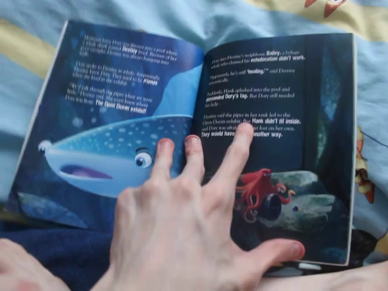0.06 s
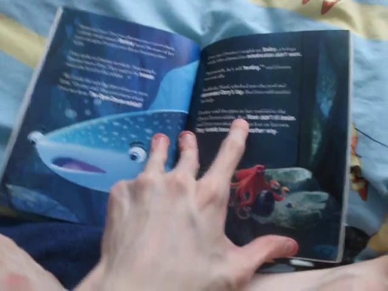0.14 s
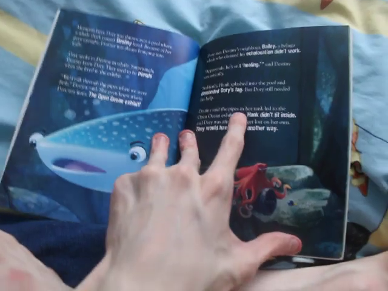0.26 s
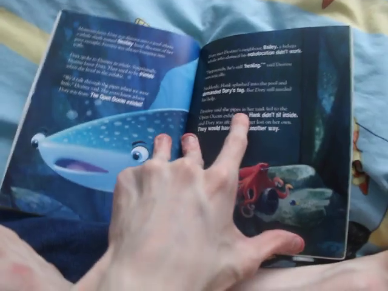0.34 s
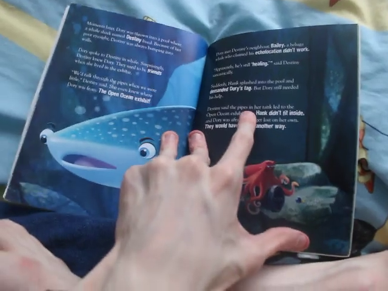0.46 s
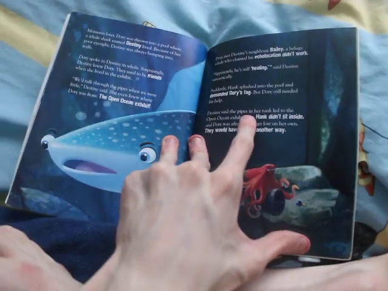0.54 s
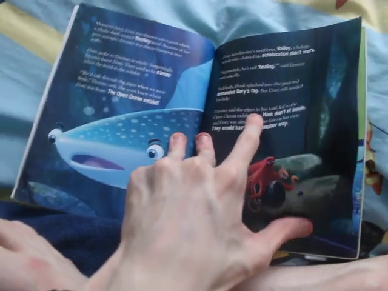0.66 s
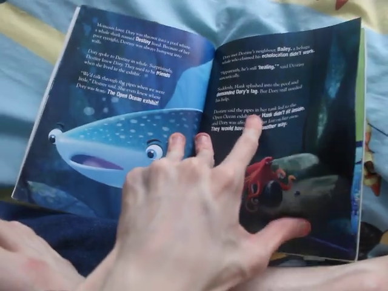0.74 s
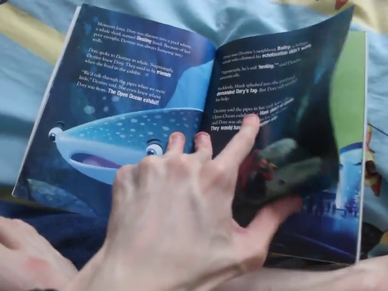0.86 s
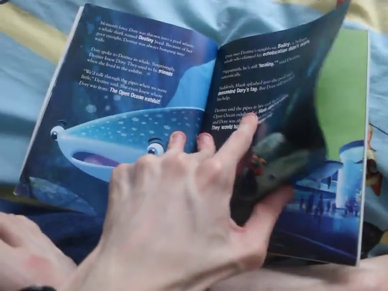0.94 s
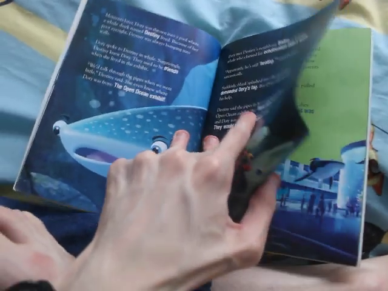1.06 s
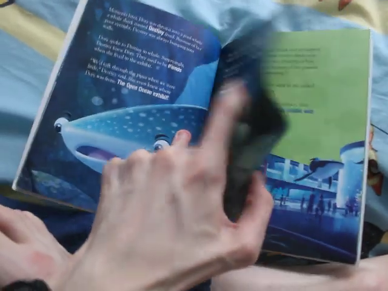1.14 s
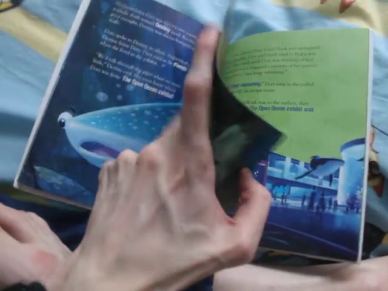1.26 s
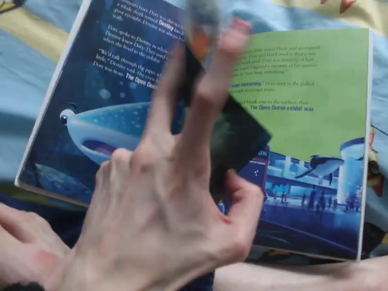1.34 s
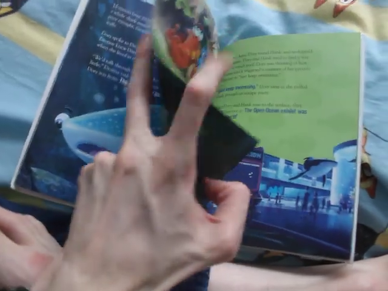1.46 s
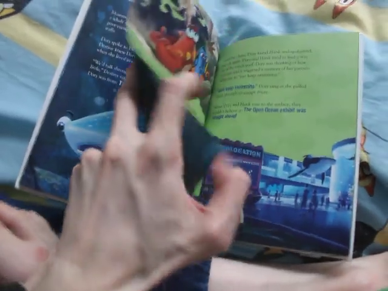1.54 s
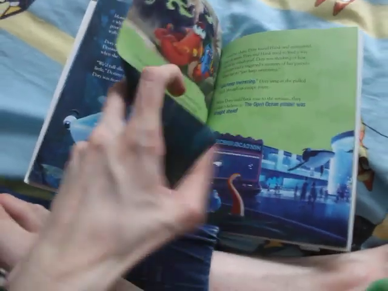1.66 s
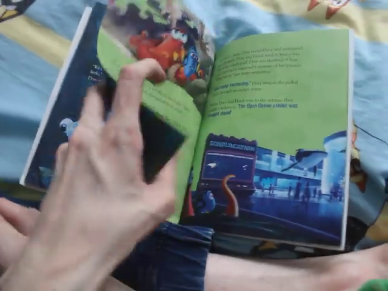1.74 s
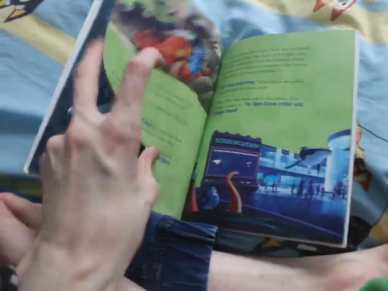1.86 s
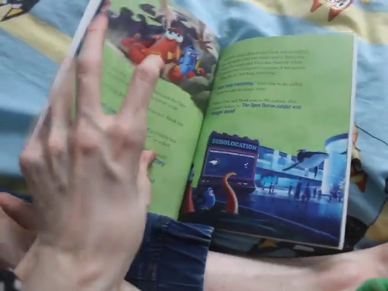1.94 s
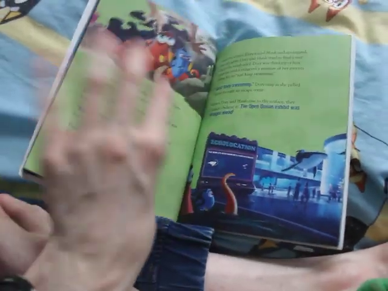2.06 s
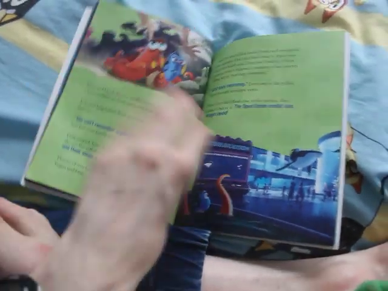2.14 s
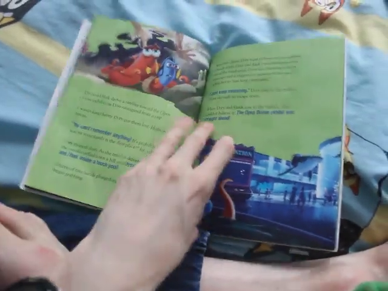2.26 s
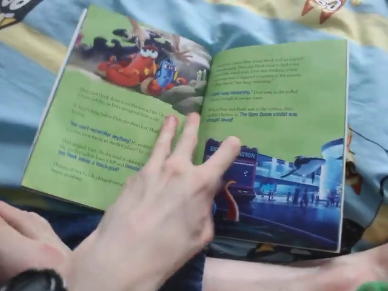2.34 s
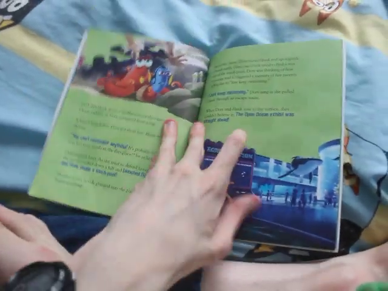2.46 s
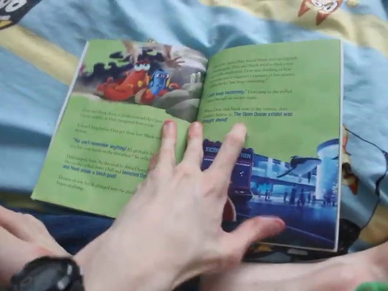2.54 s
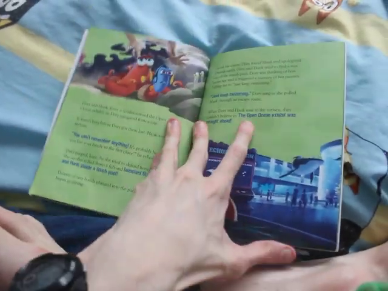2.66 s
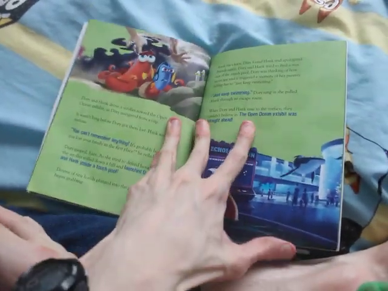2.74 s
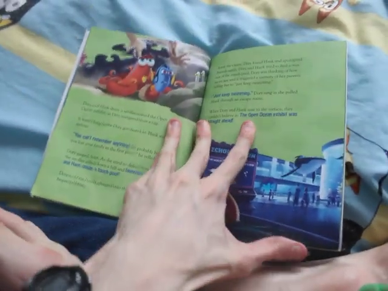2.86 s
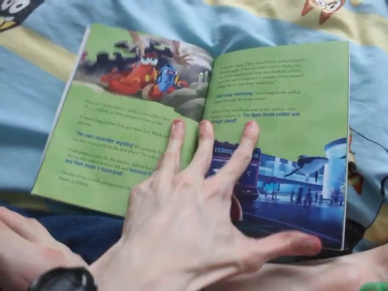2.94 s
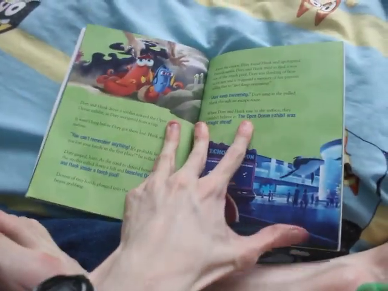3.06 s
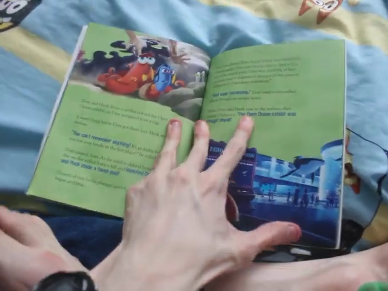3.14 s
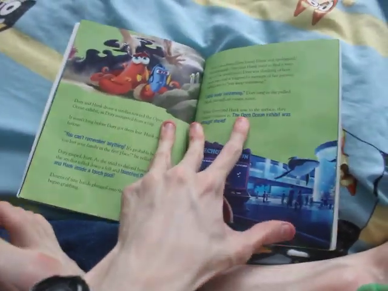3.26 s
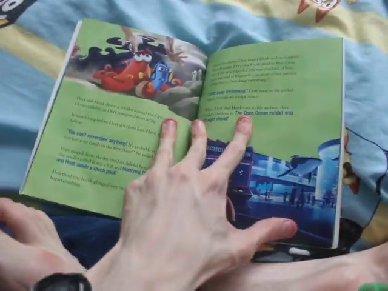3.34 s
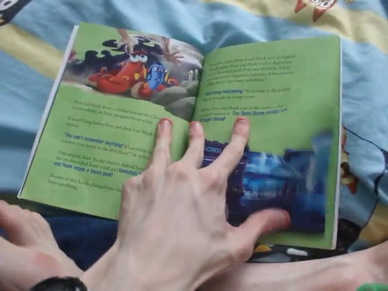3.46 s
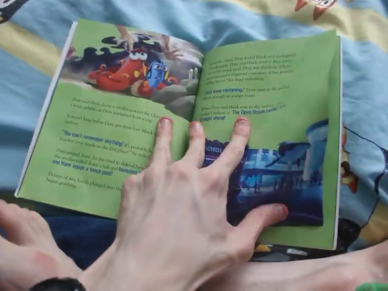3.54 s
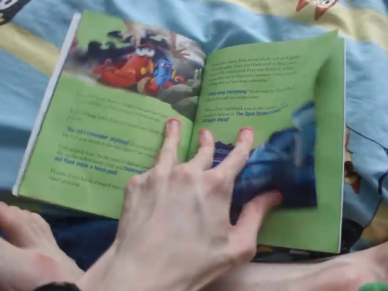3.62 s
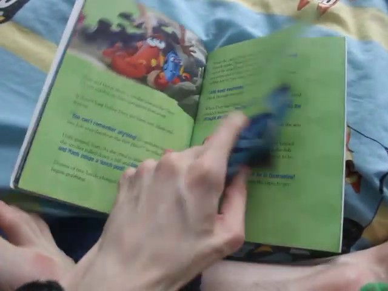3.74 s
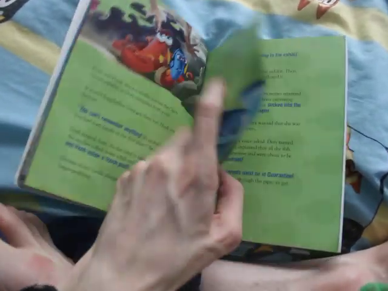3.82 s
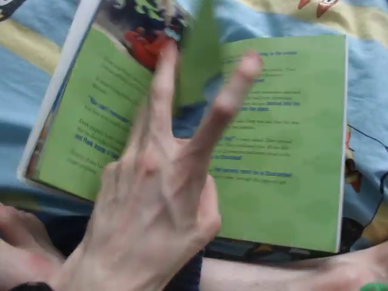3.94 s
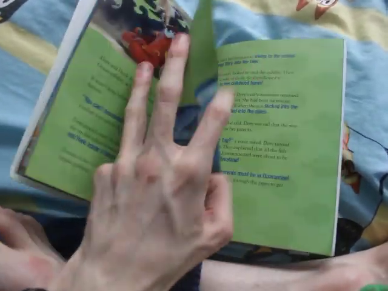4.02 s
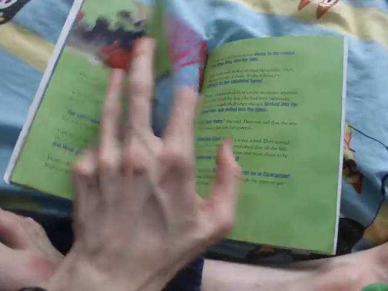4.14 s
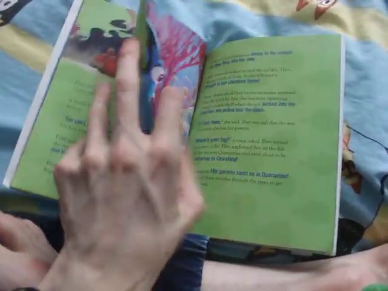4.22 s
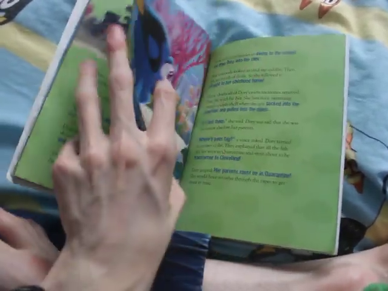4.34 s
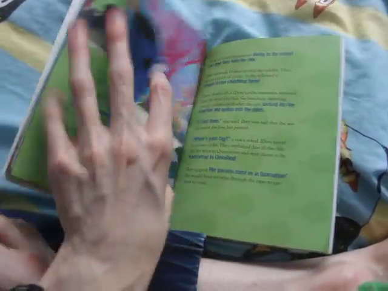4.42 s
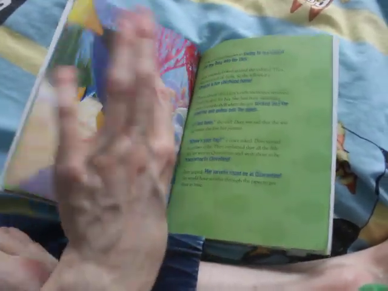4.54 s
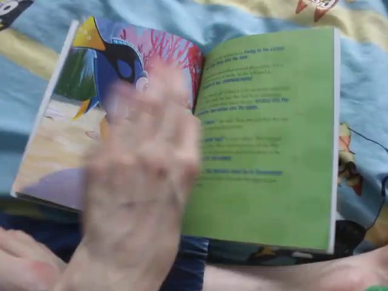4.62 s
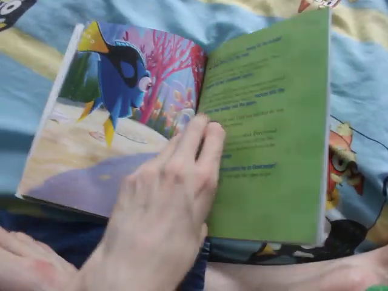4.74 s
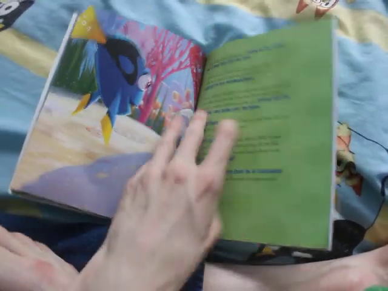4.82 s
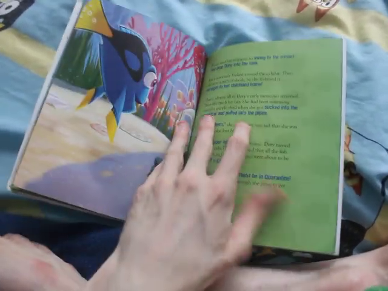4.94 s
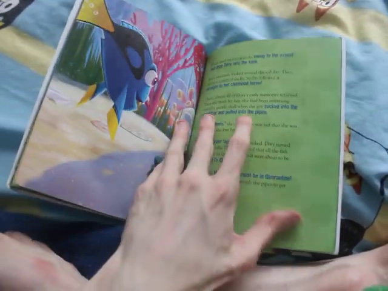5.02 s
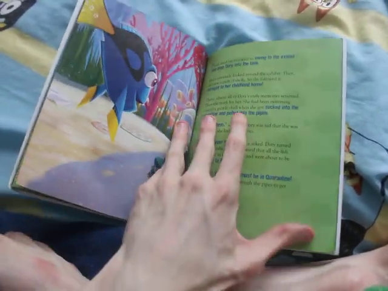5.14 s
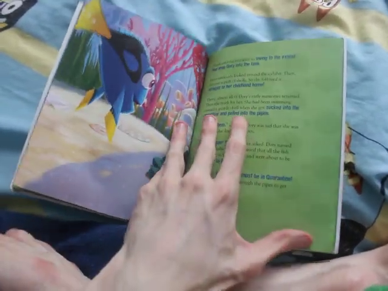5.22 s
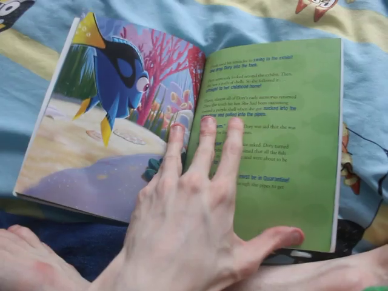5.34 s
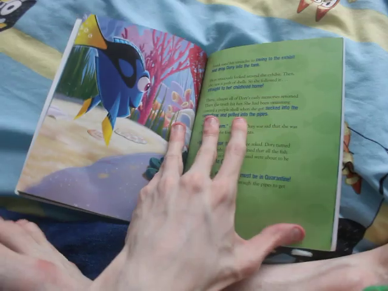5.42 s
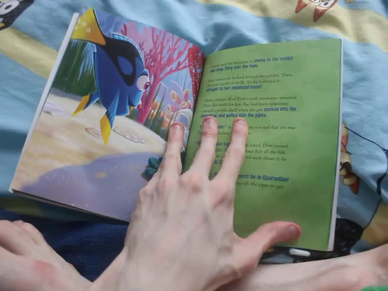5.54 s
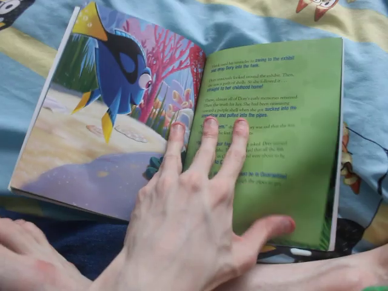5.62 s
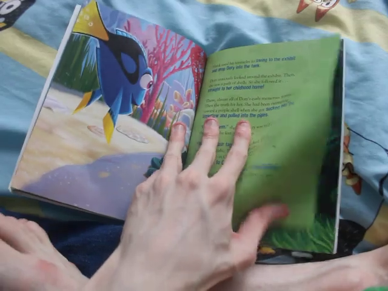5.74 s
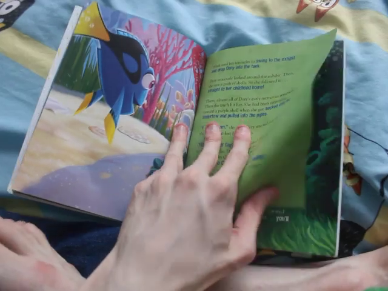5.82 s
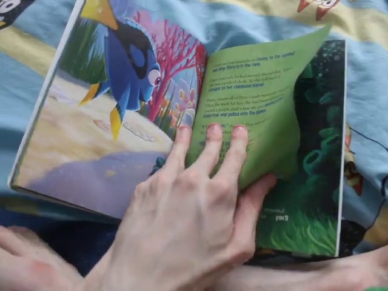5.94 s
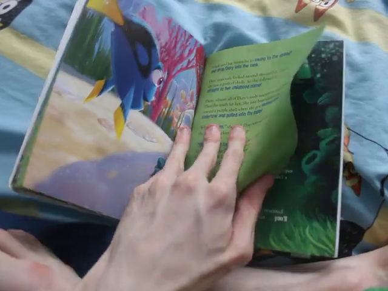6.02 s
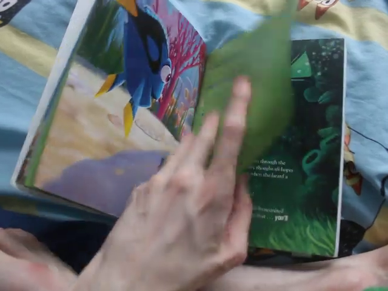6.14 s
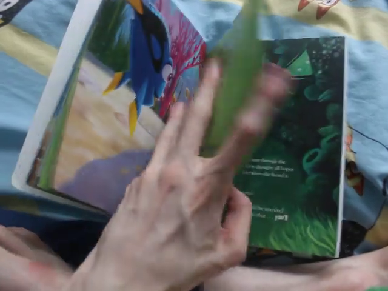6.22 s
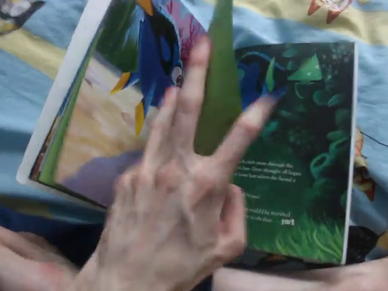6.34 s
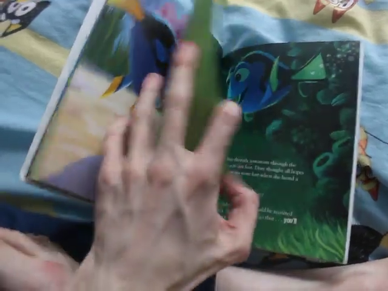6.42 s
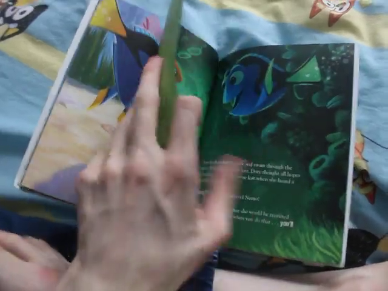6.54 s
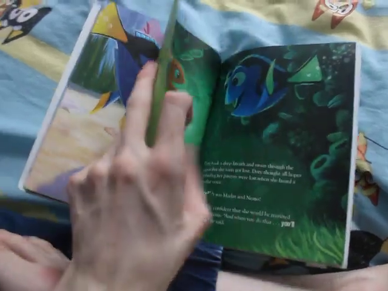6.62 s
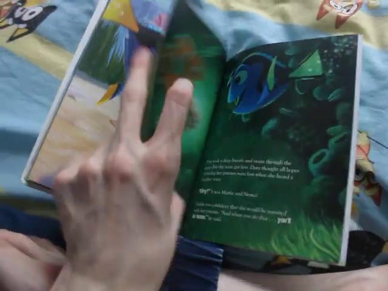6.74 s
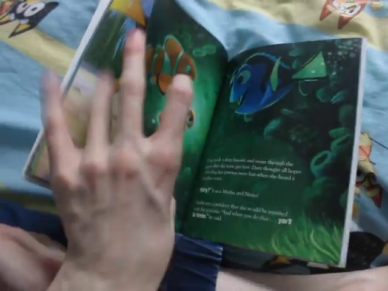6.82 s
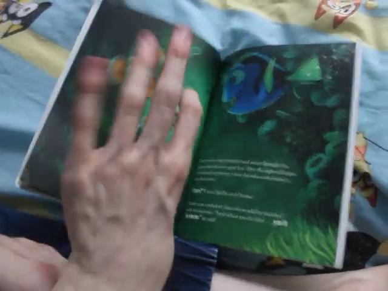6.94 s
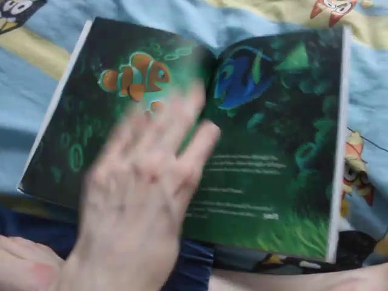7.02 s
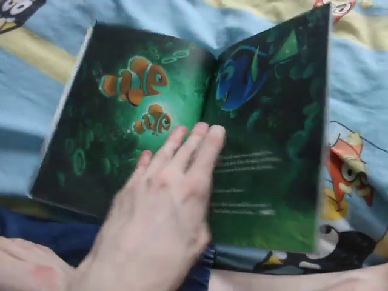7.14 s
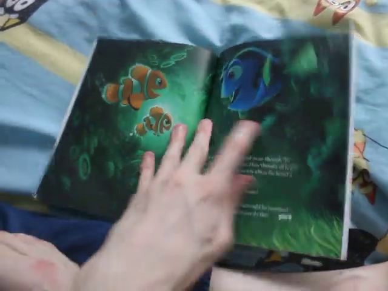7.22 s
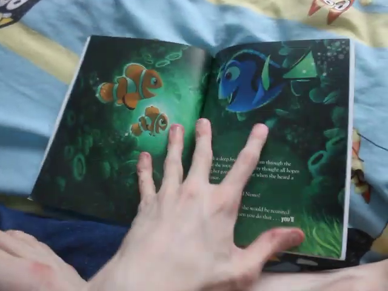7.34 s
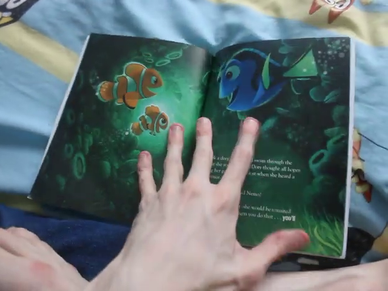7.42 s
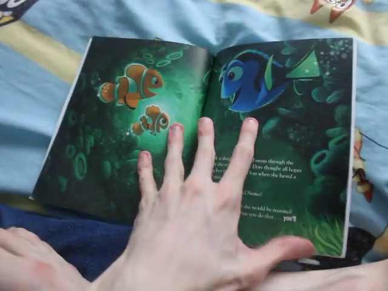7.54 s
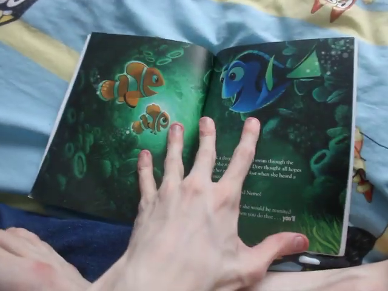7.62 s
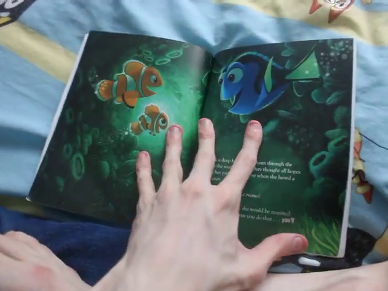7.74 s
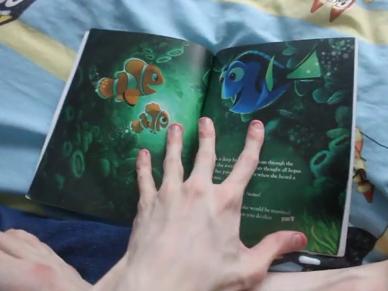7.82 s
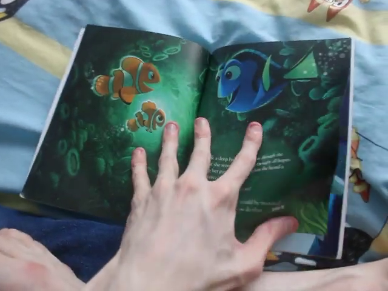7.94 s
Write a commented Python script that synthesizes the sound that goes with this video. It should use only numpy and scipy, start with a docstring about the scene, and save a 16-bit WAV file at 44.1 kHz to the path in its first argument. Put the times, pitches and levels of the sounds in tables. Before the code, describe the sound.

A hand turns thin glossy paperback pages close to the microphone, in a small, quiet room with a faint hum. In the first half second a fingernail taps lightly and a fingertip gives a short, sharp squeak on the paper. At 0.6 seconds the first page drags with a falling swish, then crinkles and snaps, loudest near 1.9 seconds. A dull pat and soft air puff follow at 2.3, then quiet smoothing with tiny fingertip slips. The second page swishes at 3.5 seconds, crackles and flops until 4.6, and is patted and stroked flat around 4.8. Another soft pat comes at 5.5. The third turn runs from 5.6 to about 6.9 seconds, with a sliding swish and duller snaps. The palm pats and rubs it from 7 seconds, with a faint stuttering squeak around 7.5. A fourth page starts swishing at 7.9 seconds.

```python
"""Thin glossy paperback pages, turned by hand on a bed, close up: three turns and the start of a fourth.
The thumb drags each leaf over the next with a falling swish as an air pocket opens under it.
The leaf slides, bows, crinkles, snaps and flops over; the palm pats it and smooths it flat.
Fingertips tap and slip on the gloss, pushed air puffs. The small room hums faintly."""
import sys
import numpy as np
from scipy import signal
from scipy.fft import rfft, irfft
from scipy.io import wavfile
from scipy.ndimage import uniform_filter1d, minimum_filter1d

SR = 44100
rng = np.random.default_rng(int(sys.argv[2]) if len(sys.argv) > 2 else 0)


def wrap_up_sound(samples):
    """Save the sound to the file named by the first command line argument, as 16-bit audio."""
    columns = np.atleast_2d(samples).T
    # keep every value between -1 and 1, then stretch to whole-number steps
    tamed = np.clip(columns, -1, 1)
    steps = np.round(tamed * 32767).astype(np.int16)
    wavfile.write(sys.argv[1], SR, steps)


N = 351918

# thumb drags a leaf over the next: start_s, length_s, level_db, attack_s
LEAF_DRAGS = [(0.598, 0.092, -30, 0.072), (3.464, 0.068, -30, 0.022), (5.617, 0.13, -30, 0.027),
              (7.871, 0.098, -30.5, 0.013)]
# lifted leaf slides along its neighbour: start_s, length_s, level_db, growth_db
LEAF_SLIDES = [(0.776, 0.13, -36, 6.5), (1.098, 0.18, -49.5, 22.5), (1.487, 0.04, -30.5, -0.5),
               (2.097, 0.021, -46.5, 0), (2.176, 0.1, -37, -1), (3.594, 0.31, -27.5, -11),
               (3.952, 0.245, -36.5, -1.5), (5.773, 0.22, -27.5, -13.5), (6.144, 0.58, -37, -5.5),
               (6.755, 0.083, -34.5, 0)]
# leaf bows over the spine: start_s, length_s, level_db
LEAF_BENDS = [(0.951, 0.017, -35.5), (1.086, 0.1, -44), (1.321, 0.11, -34), (1.527, 0.044, -36.5),
              (1.705, 0.1, -39.5), (1.806, 0.062, -31), (1.942, 0.042, -37.5), (3.901, 0.16, -38.5),
              (4.169, 0.071, -40), (4.351, 0.17, -45.5), (4.448, 0.12, -40), (5.974, 0.075, -39),
              (6.094, 0.11, -31.5), (6.347, 0.038, -34.5), (6.569, 0.049, -42), (6.853, 0.037, -35)]
# hand strokes the open page: start_s, length_s, level_db
PALM_STROKES = [(0.209, 0.073, -46), (0.331, 0.13, -47), (2.294, 0.44, -48), (2.937, 0.057, -50),
                (3.112, 0.17, -52.5), (4.591, 0.44, -44), (5.33, 0.047, -50), (7.005, 0.32, -43.5),
                (7.593, 0.083, -48.5), (7.771, 0.042, -49)]
# paper friction spectrum: freq_hz, density_db
FRICTION_SPECTRUM = [(250, -12.5), (580, -11.5), (880, -1.5), (1900, -0.5), (3100, -1.5), (6900, 0.5),
                     (8200, -5), (10000, -17), (16000, -42.5)]
# change under a light touch: freq_hz, gain_db
SKIN_EQ = [(2500, 0.5), (4200, -4.5), (5500, -2.5), (6900, -1), (8500, -0.5), (11000, 3.5)]
# leaf buckles or slaps: start_s, level_db, high_hz, rise_s, knock_db
LEAF_SNAPS = [(0.964, -29, 7740, 0.00021, -41), (1.01, -35, 8900, 0.00026, -44),
              (1.074, -32.5, 7150, 0.0002, -39.5), (1.1111, -34, 7300, 0.0002, -42),
              (1.352, -26, 7000, 0.0068, -48), (1.366, -22.5, 4500, 0.0049, -39),
              (1.416, -30, 6950, 0.0005, -47), (1.4969, -28.5, 6850, 0.0007, -58),
              (1.5628, -22.5, 4440, 0.00014, -43.5), (1.728, -32.5, 7970, 0.0021, -64),
              (1.838, -25, 7000, 0.0039, -56), (1.863, -15, 7650, 0.0005, -38),
              (1.867, -17.5, 5040, 0.0023, -37), (1.999, -28.5, 5150, 0.0021, -55),
              (3.626, -21, 3600, 0.0047, -41), (3.8346, -21, 2730, 0.00029, -34),
              (3.927, -23.5, 2180, 0.0044, -33), (4.196, -25.5, 2770, 0.003, -47),
              (4.2565, -27, 4370, 0.002, -41.5), (4.3394, -23, 2770, 0.0012, -40),
              (4.484, -27, 6320, 0.0012, -47), (4.529, -22, 4290, 0.0034, -43),
              (4.555, -27.5, 5000, 0.0046, -48), (6.052, -33, 4250, 0.0028, -53),
              (6.21, -24.5, 1406, 0.0046, -39.5), (6.372, -31, 4660, 0.0048, -37),
              (6.47, -35.5, 2360, 0.0012, -35), (6.501, -33, 5500, 0.0014, -53),
              (6.554, -33, 3860, 0.0013, -42), (6.6321, -22.5, 2700, 0.0008, -30),
              (6.8862, -30.5, 4120, 0.002, -44), (7.163, -30.5, 1540, 0.0019, -38)]
# treble of the paper: freq_hz, gain_db
PAPER_EQ = [(5500, 2), (7000, 6.5), (10000, -8.5), (16000, -46)]
# knock into the book: freq_hz, gain_db
KNOCK_EQ = [(30, 0), (300, 9), (450, 2), (700, -11.5), (2000, -10), (8000, -102)]
# hand lands on the book: start_s, relative_db, rise_s
HAND_PATS = [(1.149, -39.5, 0.0021), (2.23, -44, 0.008), (2.272, -37, 0.0082), (2.2819, -28, 0.00042),
             (2.788, -42, 0.00025), (4.068, -38, 0.0055), (4.744, -35.5, 0.01), (4.772, -35.5, 0.0075),
             (4.7925, -29, 0.0022), (5.458, -26, 0.000061), (6.413, -38, 0.0062), (7.06, -38, 0.017),
             (7.152, -38.5, 0.0043)]
# leaves clapped together: freq_hz, gain_db
PAT_EQ = [(40, -24), (270, -2.5), (500, -1), (760, -1), (1000, -1.5), (1400, -8.5), (1950, -29.5),
          (7000, -51), (12000, -68.5)]
# fingertip sticks and slips: start_s, level_db
FINGER_SLIPS = [(.196, -22.5), (0.2633, -33.5), (2.807, -48), (3.15, -49), (3.266, -49.5), (7.033, -46),
                (7.211, -44), (7.309, -47)]
# runs of slips: start_s, length_s, level_db, slips_per_s
FINGER_CHATTERS = [(3.367, 0.08, -56.5, 85), (7.425, 0.225, -46, 43)]
# sheet modes before finger damping: freq_hz, gain_db, t60_s
SHEET_MODES = [(1690, -2, 0.054), (1945, 6.5, 0.049), (2715, -2, 0.0086), (2950, 2.5, 0.047)]
# fingertip lands nail first: start_s, click_db
NAIL_TAPS = [(0.0867, -40.5), (0.381, -34.5)]
# air pushed by leaf or hand: centre_s, sigma_s, level_db, pitch_hz
AIR_PUFFS = [(1.083, 0.065, -53, 115), (1.148, 0.0081, -36.5, 220), (2.275, 0.014, -37.5, 114),
             (4.4, 0.018, -37, 132), (5.426, 0.024, -43.5, 140), (5.756, 0.036, -44.5, 129)]
# room decay: freq_hz, t60_s
ROOM_DECAY = [(150, 0.63), (900, 0.3), (7000, 0.35), (14000, 0.067)]
# still room air: freq_hz, density_db
AIR_SPECTRUM = [(25, -13), (110, -2.5), (280, -9.5), (700, -14), (2700, -24), (7000, -30), (10000, -38),
                (16000, -49)]
# mains hum: freq_hz, level_db
MAINS_HUM = [(100.5, -67.5), (300.3, -59.5)]


def rustle(patchy_db=2.37, flicker_db=1.5, light_touch_db=-46, trim_db=-1):
    """Paper rubs on paper and skin: grainy noise shaped by each movement."""
    hz, t, spec = signal.stft(friction_grains(), SR, nperseg=256, noverlap=192)
    level_db, full_db = friction_levels(t)
    colour = gain_of(curve(FRICTION_SPECTRUM, hz))
    middle, hiss = (np.sqrt(np.mean(colour ** 2 * (hz > low_hz) * (hz < high_hz)))
                    for low_hz, high_hz in [(800, 3000), (3500, 10000)])
    mid_weight = curve([(2000, 0.78), (4600, 0.24)], hz)[:, None]
    field_db = level_db + mid_weight * (full_db + 20 * np.log10(hiss / middle))
    field_db += curve(SKIN_EQ, hz)[:, None] / (1 + gain_of(2 * (level_db - light_touch_db)))
    field_db += air_pocket_db(hz[:, None], t)
    comb = leaf_echo(hz[:, None], t)
    patches = uniform_filter1d(rng.standard_normal(spec.shape), size=4, axis=0)
    field_db += patchy_db * unit_rms(uniform_filter1d(patches, size=26, axis=1))
    field_db += flicker_db * unit_rms(smooth_noise(len(t), 8))
    spec = spec * comb * colour[:, None] / hiss * gain_of(field_db + trim_db)
    return signal.istft(spec, SR, nperseg=256, noverlap=192)[1][:N]


def friction_grains(per_s=2200, spread_db=3, clump_db=3, share=0.27):
    """Hiss plus grains from fibres that let go in clusters."""
    grains = rng.standard_normal(N) * (rng.random(N) < per_s / SR)
    grains *= gain_of(spread_db * np.minimum(rng.exponential(1, N), 4))
    grains *= gain_of(clump_db * unit_rms(smooth_noise(N, 300)))
    return unit_rms(rng.standard_normal(N) + share * unit_rms(grains))


def friction_levels(t, rest_db=-59, drag_sag_db_per_s=15, bend_sag_db_per_s=19.5, hand_sag_db_per_s=12):
    """Hiss level and power-weighted fullness (mids over hiss) of all movements, in dB."""
    drags = sum(movement(t, s, length_s, db, -drag_sag_db_per_s * length_s, attack_s, release_s=0.031)
                for s, length_s, db, attack_s in LEAF_DRAGS)
    slides = sum(movement(t, *slide, attack_s=0.026, release_s=0.02) for slide in LEAF_SLIDES)
    bends = sum(movement(t, s, length_s, db, -bend_sag_db_per_s * length_s, 0.033, release_s=0.04)
                for s, length_s, db in LEAF_BENDS)
    hand = sum(movement(t, s, length_s, db, -hand_sag_db_per_s * length_s, 0.024, release_s=0.0053)
               for s, length_s, db in PALM_STROKES)
    hand += gain_of(rest_db) ** 2
    power = drags + slides + bends + hand
    full_db = (-1.5 * drags - 11 * slides + 3 * bends - 6 * hand) / power
    return 10 * np.log10(power), full_db


def movement(t, start_s, length_s, db, growth_db, attack_s, release_s):
    """Power of one movement: gathers speed, grows or sags, dies away."""
    age_s = t - start_s
    shape = np.clip(age_s / attack_s, 0, 1) * np.exp(-np.maximum(age_s - length_s, 0) / release_s)
    return (shape * gain_of(db + growth_db * np.clip(age_s / length_s, 0, 1))) ** 2


def air_pocket_db(hz, t, start_hz=6000, halving_s=0.049, peak_db=9, width_oct=0.22, shade_db=12):
    """The pocket under a dragged leaf grows, so its resonance falls; the covering leaf dulls the rub."""
    cover_db = curve([(8000, 0.64), (13000, 7.8)], hz)
    total_db = 0
    for start_s, length_s, _, _ in LEAF_DRAGS:
        pocket_hz = start_hz / (1 + np.maximum(t - start_s, 0) / halving_s)
        octaves = np.log2((hz + 1) / pocket_hz)
        opened = np.interp(t - start_s, [-.02, 0, .7 * length_s, length_s], [0, 1, 1, 0])
        resonance_db = peak_db * np.exp(-.5 * (octaves / width_oct) ** 2)
        total_db += opened * (resonance_db - shade_db * np.clip(-octaves / 2, 0, 1) - cover_db)
    return total_db


def leaf_echo(hz, t, share=0.15, centre_s=0.000652, drift_oct=0.4):
    """The moving leaf mirrors the sound: a drifting comb."""
    drift = unit_rms(uniform_filter1d(smooth_noise(len(t), 160), size=160))
    delay_s = centre_s * 2 ** (drift_oct * drift)
    return 1 + share * np.exp(-2j * np.pi * hz * delay_s)


def snaps(ripple_db=2, bow_db=5, tight_room_db=-16, wide_room_db=-10):
    """Tight bends crack high and jolt the book; wide bows flop low, knock hollowly and stir the room."""
    near, radiated = np.zeros((2, N))
    for start_s, db, high_hz, rise_s, knock_db in LEAF_SNAPS:
        width = np.clip(np.log2(5000 / high_hz), 0, 1)  # 0 tight, 1 wide
        low_hz = 678 + 556 * (high_hz / 5000) ** 2

        def crack_eq(hz):
            """A wide bow rings at its lowest resonance; each shape has its own ripple."""
            ring_db = bow_db * width * np.exp(-(np.log((hz + 1) / (1.15 * low_hz)) / .25) ** 2)
            ripple = np.interp(hz, np.linspace(0, SR / 4, 64), rng.standard_normal(64))
            return paper_band_db(hz, low_hz, high_hz, 2 + 1.8 * width) + ring_db + ripple_db * ripple

        def knock_eq(hz):
            """A wide bow knocks higher, with less bass."""
            return curve(KNOCK_EQ, hz / (1 + 0.63 * width)) - 7 * width * np.log2(1 + 200 / (hz + 1))

        crack = tint(burst(rise_s, flutter_db=-24 + 10 * width ** 2, t60_s=.045), crack_eq)
        knock = tint(burst(rise_s + .0006, flutter_db=-10, t60_s=.07), knock_eq)
        snap = at_level(crack, db) + at_level(knock, knock_db)
        add(near, start_s, snap)
        add(radiated, start_s, snap * gain_of(tight_room_db + (wide_room_db - tight_room_db) * width ** 2))
    return near + room(radiated)


def crinkles(per_s=45, offset_db=-8, spread_db=3, low_hz=2200, high_hz=9000):
    """Tiny creases give way at random while the leaf bows."""
    clicks = np.zeros(N)
    for start_s, length_s, db in LEAF_BENDS:
        for k in np.arange(length_s * per_s):
            click = burst(0.0002, flutter_db=-30, t60_s=0.02, samples=800)
            at_s = start_s + (k + rng.random()) / per_s
            add(clicks, at_s, at_level(click, db + offset_db + spread_db * rng.standard_normal()))
    return tint(clicks, lambda hz: paper_band_db(hz, low_hz, high_hz, low_order=2))


def pats(boost_db=2.5):
    """Soft fingers clap the leaves together, dull and hollow."""
    out = np.zeros(N)
    for start_s, db, rise_s in HAND_PATS:
        pat = tint(burst(rise_s, flutter_db=-14, t60_s=0.045), lambda hz: curve(PAT_EQ, hz))
        add(out, start_s, at_level(pat, db + boost_db))
    return out


def palm_bumps(per_s=45, offset_db=-8, spread_db=1):
    """The stroking palm presses the leaves together in soft, irregular bumps."""
    out = np.zeros(N)
    for start_s, length_s, db in PALM_STROKES:
        for k in np.arange(length_s * per_s):
            press = burst(0.0035, flutter_db=-14, t60_s=0.055, samples=2500)
            bump = tint(press, lambda hz: curve(PAT_EQ, hz))
            at_s = start_s + (k + rng.random()) / per_s
            add(out, at_s, at_level(bump, db + offset_db + spread_db * rng.standard_normal()))
    return out


def slips(firm_db=-44, crack_from_db=-40, ring_limit_db=-37, jitter=0.32, detune=0.032,
          finger_damping_db_per_s=900):
    """A fingertip slip rings the stiff sheet; a light one favours the top modes, a firm one cracks."""
    out, t = np.zeros(N), np.arange(3000) / SR
    mode_hz, mode_db, t60_s = np.transpose(SHEET_MODES)[:, :, None]
    decay_db = (60 / t60_s + finger_damping_db_per_s) * t
    runs = [(s + (k + jitter * rng.standard_normal()) / per_s, db + 1.5 * rng.standard_normal())
            for s, length_s, db, per_s in FINGER_CHATTERS for k in np.arange(length_s * per_s)]
    for start_s, db in FINGER_SLIPS + runs:
        tilt_db = 3 * max(firm_db - db, 0) * np.log2(mode_hz / mode_hz.max())
        peak_db = mode_db + 2 * rng.standard_normal(mode_hz.shape) + tilt_db
        bent_hz = mode_hz * (1 + detune * rng.standard_normal(mode_hz.shape))
        modes = np.sum(gain_of(peak_db - decay_db) * np.sin(2 * np.pi * bent_hz * t), axis=0)
        ring = signal.fftconvolve(burst(0.0011, flutter_db=-24, t60_s=0.025), modes)
        add(out, start_s, at_level(ring, min(db, ring_limit_db)))
        if db > crack_from_db:
            crack = tint(burst(0.00051, flutter_db=-17, t60_s=.045),
                         lambda hz: paper_band_db(hz, low_hz=1750, high_hz=4000, high_order=3.06))
            add(out, start_s, at_level(crack, db))
    return out


def taps(low_hz=2400, high_hz=9500, thump_db=-34):
    """The nail clicks on the gloss, the fingertip thumps the book."""
    out = np.zeros(N)
    for start_s, db in NAIL_TAPS:
        click = tint(burst(0.0001, flutter_db=-11, t60_s=0.041),
                     lambda hz: paper_band_db(hz, low_hz, high_hz, low_order=1))
        thump = tint(burst(0.00078, flutter_db=-18, t60_s=0.06), lambda hz: curve(KNOCK_EQ, hz))
        add(out, start_s, at_level(click, db) + at_level(thump, thump_db))
    return out


def puffs(log_width=0.27):
    """Squeezed air makes a short, soft, low swell."""
    t, hz, out = np.arange(N) / SR, np.fft.rfftfreq(N, 1 / SR), np.zeros(N)
    air = rfft(rng.standard_normal(N))
    for centre_s, sigma_s, db, pitch_hz in AIR_PUFFS:
        swell = np.exp(-.5 * ((t - centre_s) / sigma_s) ** 2)
        puff = swell * irfft(air / (1 + (np.log((hz + 1) / pitch_hz) / log_width) ** 4), N)
        out += gain_of(db) * puff * np.linalg.norm(swell) / np.linalg.norm(puff)
    return out


def room(x, samples=20000, predelay_s=0.005):
    """Diffuse reflections of a small furnished room, each band with its own decay."""
    hz, t, spec = signal.stft(rng.standard_normal(samples), SR, nperseg=256)
    decay = gain_of(-60 * t / curve(ROOM_DECAY, hz)[:, None])
    tail = signal.istft(spec * decay, SR, nperseg=256)[1]
    tail *= np.arange(len(tail)) / SR > predelay_s
    return signal.fftconvolve(x, tail / np.linalg.norm(tail))[:N]


def room_tone(air_db=-51):
    """Still room air and mains hum."""
    t, hz = np.arange(N) / SR, np.fft.rfftfreq(N, 1 / SR)
    air = unit_rms(irfft(rfft(rng.standard_normal(N)) * gain_of(curve(AIR_SPECTRUM, hz)), N))
    hum = sum(gain_of(db) * np.sqrt(2) * np.sin(2 * np.pi * (hum_hz * t + rng.random()))
              for hum_hz, db in MAINS_HUM)
    return gain_of(air_db) * air + hum


def burst(rise_s, flutter_db, t60_s, samples=6000):
    """A white cluster of tiny contacts swells and dies; the sheet flutters on for t60_s."""
    t = np.arange(samples) / SR
    rises = t / max(rise_s, 1e-4)
    flutter = gain_of(flutter_db - 60 * t / t60_s) * (1 - np.exp(-rises))
    spec = rfft((rises * np.exp(1 - rises) + flutter) * rng.standard_normal(samples))
    white = irfft(spec / np.sqrt(uniform_filter1d(abs(spec) ** 2, size=70)))
    fade = np.minimum(1, 4 * (1 - t / t[-1])) ** 2
    return white * fade


def paper_band_db(hz, low_hz, high_hz, high_order=2, low_order=4):
    """Band-pass plus the paper's treble."""
    loss = (1 + (low_hz / (hz + 1)) ** (2 * low_order)) * (1 + (hz / high_hz) ** (2 * high_order))
    return curve(PAPER_EQ, hz) - 10 * np.log10(loss)


def tint(x, eq_db):
    """Minimum-phase filter with gain eq_db(hz): no pre-ringing."""
    hz = abs(np.fft.fftfreq(4096, 1 / SR))
    log_gain = np.log(np.maximum(gain_of(eq_db(hz)), 1e-5))
    impulse = np.fft.ifft(np.exp(np.conj(signal.hilbert(log_gain)))).real[:2048]
    return signal.fftconvolve(x, impulse)[:len(x)]


def at_level(x, db):
    """Scales to the energy of 10 ms at db."""
    return gain_of(db) * x / np.sqrt(np.sum(x ** 2) / (SR / 100) + 1e-20)


def curve(points, hz):
    """Interpolates on a log-frequency axis."""
    point_hz, value = np.transpose(points)
    return np.interp(np.log(hz + 1), np.log(point_hz + 1), value)


def smooth_noise(count, window):
    return uniform_filter1d(rng.standard_normal(count), size=window)


def gain_of(db):
    return 10 ** (np.asarray(db) / 20)


def unit_rms(x):
    return x / np.sqrt(np.mean(x ** 2) + 1e-20)


def add(mix, start_s, sound):
    part = mix[max(round(start_s * SR), 0):][:len(sound)]
    part += sound[:len(part)]


def scene(room_db=-16):
    """The book up close, a little room behind it; mono."""
    handling = rustle() + crinkles() + pats() + taps() + puffs() + palm_bumps()
    return (handling + gain_of(room_db) * room(handling) + snaps() + slips() + room_tone())[None]


def record(dry, ceiling=0.98, cutoff_hz=15600):
    """Fast peak limiter, then low-pass."""
    allowed = ceiling / np.maximum(abs(dry), ceiling)
    limited = dry * uniform_filter1d(minimum_filter1d(allowed, size=45), size=45)
    lowpass = signal.firwin(255, cutoff_hz, window=("kaiser", 9), fs=SR)
    return signal.oaconvolve(limited, lowpass[None], "same")


dry = scene()
out = record(dry)
wrap_up_sound(out)
```